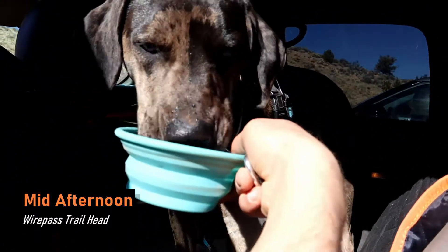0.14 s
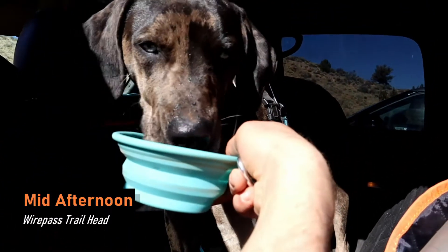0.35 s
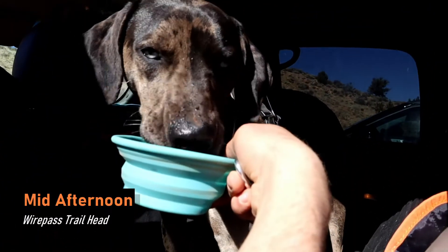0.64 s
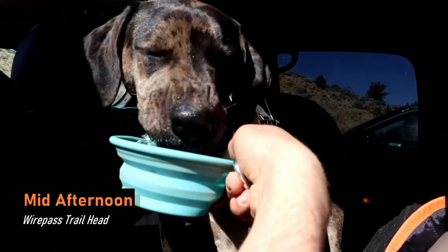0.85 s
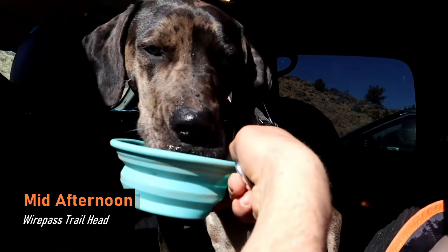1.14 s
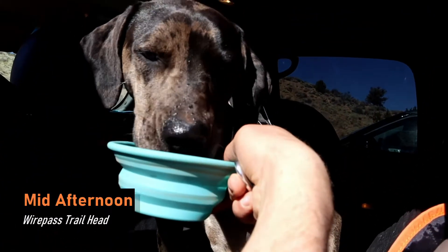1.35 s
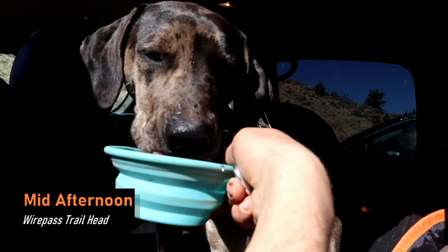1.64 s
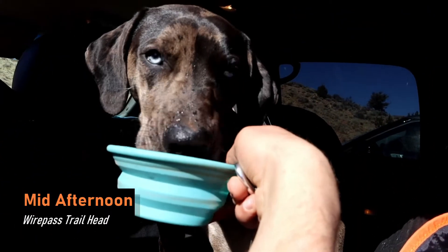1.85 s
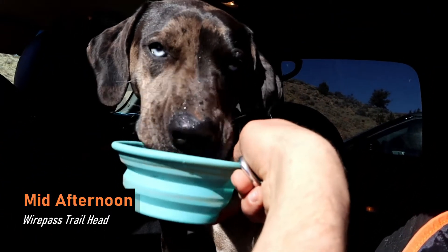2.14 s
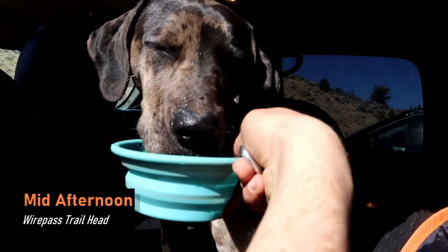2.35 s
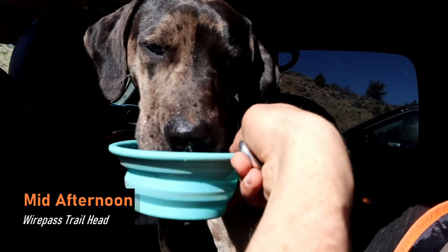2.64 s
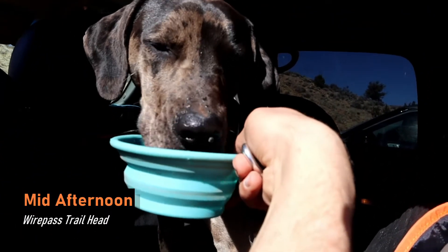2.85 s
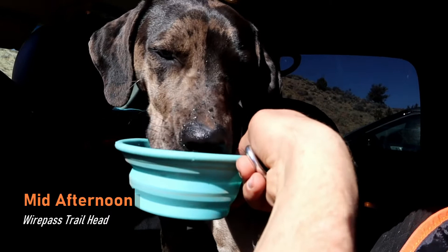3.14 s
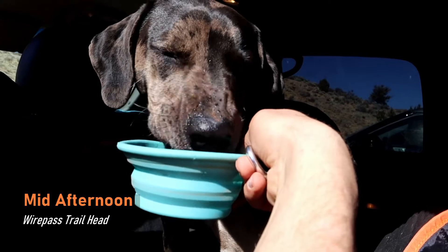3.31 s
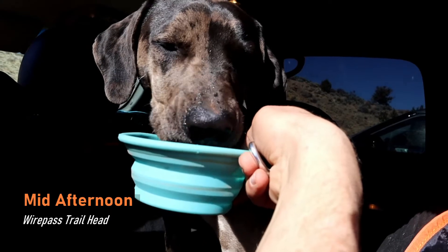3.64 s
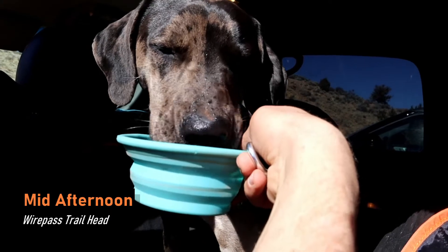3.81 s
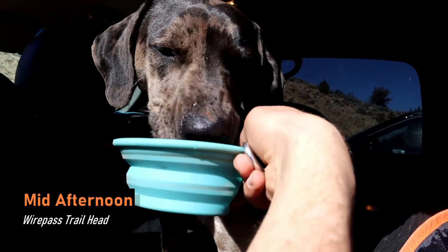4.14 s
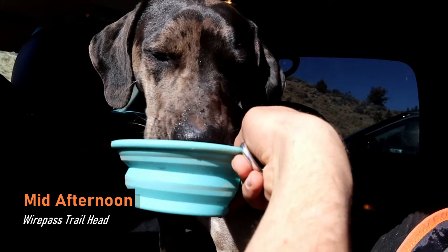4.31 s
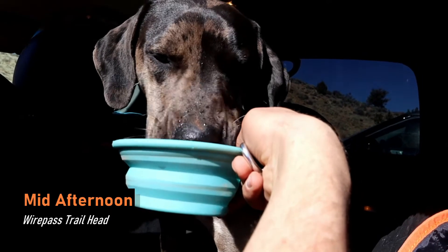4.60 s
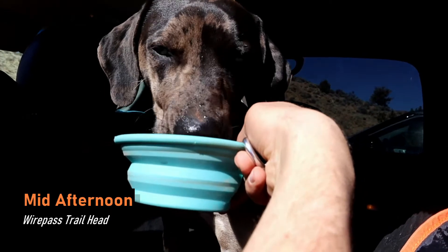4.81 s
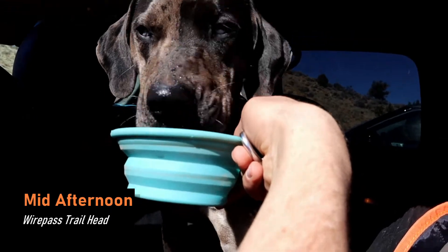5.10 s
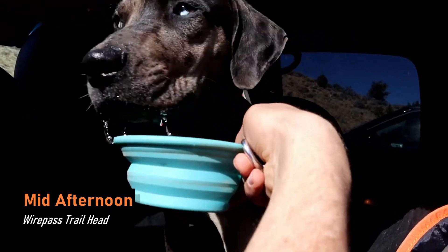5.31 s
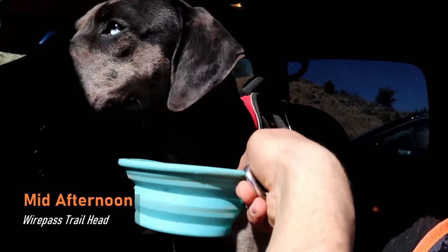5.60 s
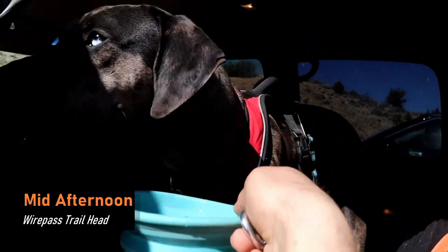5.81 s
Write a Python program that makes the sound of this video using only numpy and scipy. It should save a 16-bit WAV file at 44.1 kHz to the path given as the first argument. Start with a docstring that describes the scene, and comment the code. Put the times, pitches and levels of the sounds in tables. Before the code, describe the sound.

A dog drinks from a bowl right by the microphone inside a parked car. It laps steadily, two or three times a second, each lap a small slosh with bubbly pops and wet smacks. Drips, dull swallows and a few soft puffs through the nose come in between. A breeze rumbles on the microphone, strongest about halfway. Near the end the lapping stops, leaving a last smack and a soft breath out.

```python
"""Dog lapping water in a parked car

A dog drinks from a soft hand-held bowl, close to the microphone. Each lap is a slosh of small
bubbles, air pockets popping under the tongue and wet smacks of the mouth. Between laps the dog
swallows or blows through its nose; a breeze from outside buffets the microphone."""
import sys
import numpy as np
from scipy import signal
from scipy.fft import rfft, irfft, next_fast_len
from scipy.io import wavfile
from scipy.ndimage import uniform_filter1d

SR = 44100
rng = np.random.default_rng(int(sys.argv[2]) if len(sys.argv) > 2 else 0)


def master(y):
    """Save y as 16-bit WAV."""
    cut = np.clip(np.atleast_2d(y).T, -1, 1)
    pcm = np.round(cut * 32767)  # scale
    wavfile.write(sys.argv[1], SR, pcm.astype(np.int16))


N = 262783
TIME_S = np.arange(N) / SR
SLOW_S = np.arange(0, N + 16, 16) / SR   # envelope grid
CUTOFF_HZ = 16000

# tongue plunges: (start [s], length [s], mid-lap slosh [dB], mid-lap spray [dB])
LAPS = [(0.0, 0.17, -37.5, -43), (0.451, 0.15, -40, -43.5), (0.765, 0.19, -41, -45.5),
        (1.17, 0.086, -40, -39), (1.603, 0.19, -40.5, -46.5), (1.981, 0.17, -37, -45),
        (2.366, .17, -42.5, -44.5), (2.859, .16, -37.5, -43.5), (3.307, .085, -36, -39),
        (3.581, 0.2, -41, -41.5), (4.139, .11, -35.5, -42.5), (4.516, .125, -41, -42),
        (4.935, 0.061, -35, -44.5)]


def from_db(db):
    """Decibels to gain."""
    return 10 ** (np.asarray(db) / 20)


def unit_rms(x):
    """Scale to rms 1."""
    return x / np.sqrt(np.mean(x ** 2) + 1e-20)


def gain_at(spectrum, hz):
    """Gain of a (frequency [Hz], level [dB]) curve at hz."""
    points_hz, db = np.transpose(spectrum)
    return from_db(np.interp(np.log(hz + 1e-9), np.log(points_hz), db))


def band(x, low_hz, high_hz):
    """Causal band-pass."""
    return signal.sosfilt(signal.butter(2, [low_hz, high_hz], "band", fs=SR, output="sos"), x)


def lowpass(x, hz):
    """Causal low-pass."""
    return signal.sosfilt(signal.butter(2, hz, fs=SR, output="sos"), x)


def noise(spectrum):
    """Coloured noise, rolled off beyond the ends of its spectrum; rms 1."""
    size = next_fast_len(N)
    hz = np.fft.rfftfreq(size, 1 / SR) + 1
    rolloff = 1 / (1 + (spectrum[0][0] / hz) ** 6 + (hz / spectrum[-1][0]) ** 6)
    white = rfft(rng.standard_normal(size))
    return unit_rms(irfft(white * gain_at(spectrum, hz) * rolloff, size)[:N])


def steady(x, span_s):
    """Even out swells slower than span_s; rms about 1."""
    return x / np.sqrt(np.abs(uniform_filter1d(x ** 2, int(span_s * SR))) + 1e-9)


def add(track, s, sound):
    """Mix a sound into the track at time s."""
    i = int(np.clip(s * SR, 0, N - 1))
    track[i:i + len(sound)] += sound[:N - i]


def ring(hz, length_s, attack_s, glide):
    """A quickly choked resonance that glides in pitch (up if glide > 0)."""
    t = np.arange(int(3 * length_s * SR) + 2) / SR
    swell = (1 - np.exp(-t / attack_s)) * np.exp(-(t / length_s) ** 2)
    pitch_hz = hz * np.exp(glide * (np.tanh(t / length_s) - .5))
    return swell / swell.max() * np.sin(2 * np.pi * np.cumsum(pitch_hz) / SR)


def droplet(hz, cycles):
    """A small bubble rings for some cycles, with a slight random glide."""
    return ring(hz, cycles / hz, attack_s=1 / hz, glide=.08 * rng.standard_normal())


def tear(low_hz, high_hz, decay_s):
    """A water film tears in uneven jerks; peak 1."""
    t = np.arange(SR // 20) / SR
    jerks = np.exp(.7 * unit_rms(uniform_filter1d(rng.standard_normal(len(t)), SR // 700)))
    swell = np.sqrt(t) * np.exp(-t / decay_s)
    burst = band(rng.standard_normal(len(t)) * jerks * swell, low_hz, high_hz)
    return burst / np.abs(burst).max()


def strays(level_db, overrun_s, per_lap, hz=0, octaves=0, spread_db=3):
    """Small sounds scattered over each lap and just beyond: (time [s], level [dB], pitch [Hz])."""
    rows = []
    for start_s, length_s, *_ in LAPS:
        for k, (when, size, pitch) in enumerate(rng.random((per_lap, 3))):
            s = start_s + (k + when) / per_lap * (length_s + overrun_s)
            rows.append((s, level_db + spread_db * (2 * size - 1), hz * 2 ** (octaves * (pitch - .5))))
    return rows


def still_air(level_db=-56.5):
    """Faint, steady hiss."""
    # (frequency [Hz], level [dB])
    spectrum = [(60, -5), (800, -5), (2000, -11), (9000, -21), (18000, -22)]
    return from_db(level_db) * noise(spectrum)


def breeze(calm_db=-40, rise_s=.057, fall_s=.069):
    """Eddies at the microphone: deep rumble in light air, brighter in gusts."""
    # slow part of the wind: (time [s], level [dB])
    base_curve = [(0.0, -40.5), (0.63, -42.5), (1.16, -49.5), (2.44, -46.5), (2.56, -36), (3.42, -27),
                  (4.31, -45.5), (5.01, -47.5), (5.18, -31), (5.96, -44.5)]
    # gusts on top: (peak time [s], level [dB])
    gusts = [(0.25, -39), (0.6, -42), (2.03, -32), (2.498, -27.5), (2.66, -25.5), (3.091, -12),
             (3.422, -17.5), (3.55, -29), (3.84, -30), (4.62, -30.5), (5.168, -24.5), (5.76, -32.5)]
    # rumble: (frequency [Hz], level [dB])
    spectrum = [(16, -6), (45, 0), (62, 0), (80, -7), (120, -11), (220, -24), (500, -52)]
    gust_gain = 0
    for s, db in gusts:
        age_s = SLOW_S - s
        slope = 2 * age_s / np.where(age_s < 0, rise_s, fall_s)
        gust_gain = np.hypot(gust_gain, from_db(db) / np.cosh(np.clip(slope, -20, 20)))
    base_gain = from_db(np.interp(TIME_S, *np.transpose(base_curve)))
    gain = np.hypot(base_gain, np.interp(TIME_S, SLOW_S, gust_gain))
    deep = unit_rms(lowpass(noise(spectrum), hz=24))
    brightness = np.clip((20 * np.log10(gain) - calm_db) / 20, .1, 1)
    return gain * steady((1 - brightness) * deep + brightness * noise(spectrum), span_s=.041)


def cabin(x, wet_db=-15, t60_s=.07, delay_s=.004):
    """Seats and windows add a very short tail."""
    t = np.arange(SR // 4) / SR
    decay = from_db(-60 * t / t60_s) * (t > delay_s)
    tail = band(rng.standard_normal(len(t)) * decay, 180, 13500)
    return x + from_db(wet_db) * signal.fftconvolve(x, tail / np.linalg.norm(tail))[:N]


def snuffs(ramp_s=.14):
    """Air hisses through the nose, swelling and fading."""
    # (start [s], end [s], level at full flow [dB])
    breaths = [(1.417, 1.66, -43.5), (3.345, 3.645, -46), (5.695, 6.068, -46)]
    # nasal hiss: (frequency [Hz], level [dB])
    spectrum = [(200, -8), (450, -3), (820, 1), (1150, -7), (1500, 0), (2900, -12), (4000, -4), (4400, -11),
                (5000, -6), (5700, -16), (16000, -22)]
    gain = np.zeros(N)
    for start_s, end_s, db in breaths:
        flow = np.clip(np.minimum(TIME_S - start_s, end_s - TIME_S) / ramp_s, 0, 1)
        gain += from_db(db) * flow
    return gain * noise(spectrum)


def drips(min_db=-38, range_db=12, centre_hz=1300, octaves=1.34, cycles=2.1, end_s=5.3, count=130):
    """Water runs off the jowls into the bowl: faint plips, each with a wet tear."""
    out = np.zeros(N)
    tears = [tear(600, 3200, decay_s=.002) for _ in range(12)]
    for k, (when, size, pitch) in enumerate(rng.random((count, 3))):
        s = (k + when) / count * end_s
        peak = from_db(min_db + range_db * size)
        hz = centre_hz * 2 ** (octaves * (pitch - .5))
        add(out, s, peak * ring(hz, cycles / hz, attack_s=1 / hz, glide=.24))
        add(out, s, peak * from_db(-8) * tears[k % len(tears)])
    return out


def gurgles(glide=.225, churn_hz=70):
    """A bubbling note rises as the hollow of the tongue fills."""
    # (start [s], length [s], level [dB], pitch [Hz])
    fills = [(0.51, 0.072, -35.5, 582), (1.68, 0.11, -37, 558), (2.93, 0.096, -37, 590),
             (3.58, 0.045, -36, 570), (3.675, 0.039, -32, 853)]
    out = np.zeros(N)
    for s, length_s, db, hz in fills:
        progress = np.linspace(0, 1, int(length_s * SR))
        complex_noise = [1, 1j] @ rng.standard_normal((2, SR // 2))
        churn = lowpass(complex_noise, churn_hz)[-len(progress):]
        pitch_hz = hz * np.exp(glide * (progress - .5))
        note = churn * np.exp(2j * np.pi * np.cumsum(pitch_hz) / SR)
        add(out, s, from_db(db) * np.sin(np.pi * progress) * unit_rms(note.real))
    return out


def gulps(pitch_hz=222, knock_db=-9):
    """A dull knock of jaw and throat with a short, low ring."""
    # (time [s], level [dB], ring length [s])
    swallows = [(0.176, -27, 0.012), (0.217, -30.5, 0.018), (0.998, -31, 0.012), (1.252, -31, 0.014),
                (1.320, -25, 0.017), (1.368, -27, 0.0081), (1.848, -34.5, 0.029), (2.589, -20.5, 0.0041),
                (3.032, -20, 0.011), (3.784, -28.5, 0.0049), (3.830, -26.5, .008), (4.21, -35, 0.012),
                (4.26, -25, 0.012), (4.306, -29.5, 0.022), (4.636, -25.5, .012)]
    out = np.zeros(N)
    for (s, db, length_s), detune in zip(swallows, rng.normal(1, .05, len(swallows))):
        add(out, s, from_db(db) * ring(pitch_hz / detune, length_s, attack_s=.00037, glide=.052))
        add(out, s, from_db(db + knock_db) * tear(340, 560, decay_s=.0013))
    return out


def movement(start_s, hold_s, attack_s, release_s):
    """Envelope of one stir: the water starts to move just before it and fizzes on after it."""
    lead_db, lead_s = -14, .03
    settle_db, settle_s = -16.5, .1
    age_s = SLOW_S - start_s
    after_s = np.maximum(age_s - hold_s, 0)
    lead = from_db(lead_db) * np.exp(np.minimum(age_s, 0) / lead_s)
    settle = from_db(settle_db) * np.exp(-after_s / settle_s)
    rise = np.maximum(np.clip(age_s / attack_s, 0, 1), lead)
    return rise * np.maximum(np.exp(-after_s / release_s), settle)


def stirring(slosh_sag_db=5, spray_rise_db=15):
    """Slosh and spray gains: laps shift towards spray as the tongue lifts; squelches are brief."""
    # mouth shuts or opens on the water: (time [s], slosh [dB], spray [dB])
    squelches = [(0.217, -28, -36.5), (0.67, -40.5, -49), (0.999, -29, -32.5), (1.366, -29.5, -34),
                 (1.453, -43.5, -41), (1.844, -31, -37), (2.211, -31, -34.5), (2.586, -37.5, -36),
                 (2.753, -46.5, -51.5), (3.078, -30.5, -35), (3.241, -29, -43), (3.505, -35, -40.5),
                 (3.827, -33.5, -40.5), (4.069, -53, -41.5), (4.308, -29, -36), (4.698, -33.5, -38),
                 (5.09, -34, -40), (5.196, -46, -49), (5.525, -28, -30.5), (5.693, -42.5, -46.5)]
    power = np.zeros((2, len(SLOW_S)))
    for s, length_s, slosh_db, spray_db in LAPS:
        lift = np.clip((SLOW_S - s) / length_s, 0, 1) - .5
        gains = from_db([slosh_db - slosh_sag_db * lift, spray_db + spray_rise_db * lift])
        power += (gains * movement(s, length_s, attack_s=.004, release_s=.004)) ** 2
    for s, slosh_db, spray_db in squelches:
        gains = from_db([[slosh_db], [spray_db]])
        power += (gains * movement(s, hold_s=.025, attack_s=.0017, release_s=.016)) ** 2
    return [np.interp(TIME_S, SLOW_S, gain) for gain in np.sqrt(power)]


def bubbles(spectrum, per_s, spread_db, sizes=60):
    """Bubbles form at random, rarer above 5 kHz, over a noise wash of fainter ones; rms 1."""
    out = np.zeros(N)
    pitches_hz = np.geomspace(spectrum[0][0], min(spectrum[-1][0], CUTOFF_HZ), sizes)
    shares = np.minimum(1, 5000 / pitches_hz)
    for hz, share in zip(pitches_hz, shares / shares.sum()):
        grain = droplet(hz, cycles=6 * np.sqrt(hz / 1000))
        grain *= gain_at(spectrum, hz) * np.sqrt(hz / share / np.sum(grain ** 2))
        births_s = rng.uniform(0, N / SR, int(per_s * share * N / SR))
        gains = from_db(spread_db * np.minimum(rng.exponential(1, len(births_s)), 4))
        for s, gain in zip(births_s, gains):
            add(out, s, gain * grain)
    return unit_rms(steady(out, span_s=.04) + .3 * noise(spectrum))


def water():
    """The tongue stirs large bubbles into the bowl and throws a fine spray."""
    # both: (frequency [Hz], level [dB])
    slosh_spectrum = [(260, -4), (550, 9), (1100, 2.5), (1550, 12), (2100, 6.5), (2900, -29.5)]
    spray_spectrum = [(2300, 0), (3800, 0), (5200, -3), (6500, -9), (8200, -17), (16500, -18)]
    slosh_gain, spray_gain = stirring()
    slosh = bubbles(slosh_spectrum, per_s=1400, spread_db=5)
    spray = bubbles(spray_spectrum, per_s=3000, spread_db=5.5)
    return slosh_gain * slosh + spray_gain * spray


def ticks():
    """Droplets burst with a short, high click; fainter ones come with every lap."""
    # (time [s], level [dB])
    bursts = [(0.6738, -24.5), (1.177, -17.5), (1.242, -13), (1.31, -18.5), (1.698, -21), (1.7254, -24.5),
              (1.857, -23), (2.0414, -25), (2.471, -28), (2.504, -20.5), (2.863, -24.5), (3.379, -23),
              (3.6697, -18.5), (3.7397, -14), (4.1892, -13), (4.204, -28), (4.331, -28), (4.6005, -18.5),
              (5.425, -27.5), (5.812, -26)]
    out = np.zeros(N)
    for s, db, *_ in bursts + strays(level_db=-29, overrun_s=.02, per_lap=4):
        add(out, s, from_db(db) * tear(7500, 16500, decay_s=.0014))
    return out


def smacks(ring_db=-2, tear_db=-6, shower_db=-7, shower_s=.0054, drops=5):
    """Tongue and lips part: a film snaps, a tiny pocket rings, droplets of similar size follow."""
    # (time [s], level [dB], pitch [Hz])
    snaps = [(0.136, -22, 4120), (0.227, -13, 5440), (0.303, -18.5, 5340), (0.456, -21.5, 3770),
             (0.6748, -25.5, 3840), (0.839, -18.5, 3020), (1.0296, -21, 5700), (1.078, -22, 3300),
             (1.17, -22.5, 3500), (1.18, -16.5, 3130), (1.2415, -27, 3550), (1.264, -24.6, 3670),
             (1.3694, -15, 4650), (1.6129, -22.5, 3350), (1.629, -15.5, 3700), (1.7796, -19.5, 3680),
             (1.847, -16.5, 5880), (1.853, -7.5, 5600), (1.9861, -18, 5850), (2.043, -15.5, 4100),
             (2.112, -15.5, 3100), (2.21, -11, 5150), (2.2268, -18.5, 5600), (2.3634, -23.5, 5720),
             (2.591, -18.5, 5100), (2.6835, -21, 4970), (3.087, -11, 5020), (3.242, -21, 3160),
             (3.736, -12.5, 5580), (3.8605, -13, 4520), (3.929, -21.5, 5100), (4.2334, -23, 4940),
             (4.3206, -20, 4940), (4.3404, -19, 3240), (4.5965, -13, 3030), (4.6868, -21, 5650),
             (4.7616, -21.5, 5740), (4.9506, -14.5, 3930), (4.992, -9, 3880), (5.0901, -17, 5400),
             (5.195, -19.5, 5270), (5.3098, -29.5, 4020), (5.54, -11, 3270)]
    out = np.zeros(N)
    for s, db, hz in snaps + strays(level_db=-26, overrun_s=.0055, per_lap=2, hz=3720, octaves=.88):
        pocket = ring(hz, length_s=.0014, attack_s=.0005, glide=.1 * rng.standard_normal())
        add(out, s, from_db(db + ring_db) * pocket)
        add(out, s, from_db(db + tear_db) * tear(2000, 5800, decay_s=.002))
        for late, detune in zip(rng.random(drops), np.clip(rng.standard_normal(drops), -2, 2)):
            drop = droplet(hz * np.exp(.18 * detune), cycles=9)
            add(out, s + shower_s * late, from_db(db + shower_db) * (1 - late / 2) * drop)
    return out


def pops(attack_s=.00041, glide=.059, lower_db=-6, upper_db=-11, tear_db=-12, rebound_db=-6):
    """An air pocket opens with a main note, two side notes and a tear, then rings as flesh rebounds."""
    # louder pockets between tongue, lips and water; fainter ones are scattered over each lap: (time [s], main
    # note level [dB], pitch [Hz])
    loud_pockets = [(0.0405, -21, 1530), (0.1375, -18, 1064), (0.2266, -15, 1820), (0.248, -27, 1660),
                    (0.2998, -15.5, 1875), (0.333, -28, 556), (0.385, -33.5, 870), (0.4611, -16.5, 1820),
                    (0.4692, -12, 2010), (0.498, -18, 1540), (0.7841, -24, 1060), (0.8484, -3, 1560),
                    (0.8658, -18, 1510), (0.8871, -19.5, 1490), (0.9131, -11, 1540), (1.0025, -15, 1480),
                    (1.0109, -30, 1390), (1.0187, -19, 1700), (1.0321, -21, 1960), (1.0785, -28, 2640),
                    (1.1873, -17.5, 1620), (1.2205, -17, 2780), (1.2484, -23, 525), (1.3697, -20, 1600),
                    (1.4065, -20, 1520), (1.6206, -15.5, 1620), (1.6476, -16, 750), (1.6577, -10.5, 1420),
                    (1.7584, -20, 1420), (1.783, -20, 1590), (1.8457, -13, 1450), (1.8545, -8.5, 1650),
                    (1.861, -9.5, 1800), (1.908, -28, 540), (1.9885, -15, 1480), (1.9995, -11.5, 1780),
                    (2.0375, -24.5, 736), (2.1132, -21, 1590), (2.2115, -19, 1074), (2.3801, -25.5, 1480),
                    (2.4716, -17.5, 2930), (2.5907, -18.5, 1940), (2.631, -24, 1480), (2.8634, -22, 1520),
                    (2.8804, -22, 1500), (3.0856, -6.5, 1595), (3.0987, -14, 1930), (3.2527, -19, 1840),
                    (3.2644, -14, 1510), (3.2711, -18.5, 1100), (3.3217, -15, 1970), (3.334, -15.5, 2280),
                    (3.3661, -20, 1580), (3.518, -23, 860), (3.7345, -11.5, 1560), (3.9399, -28.5, 1075),
                    (4.0807, -13, 1920), (4.0929, -15, 1860), (4.1654, -24.5, 1065), (4.2096, -23.5, 550),
                    (4.2403, -17, 1430), (4.3206, -12, 1574), (4.3397, -14, 1910), (4.3753, -25, 1850),
                    (4.4896, -23.5, 1900), (4.5227, -15, 1640), (4.5977, -17, 1480), (4.6934, -23, 600),
                    (4.7113, -14, 1487), (4.8601, -25, 1500), (4.9513, -17.5, 975), (4.9614, -17, 1480),
                    (4.9918, -15.5, 1530), (5.0897, -21, 1650), (5.1145, -28, 1550), (5.268, -33.5, 550),
                    (5.5, -26, 2330), (5.5275, -21, 480), (5.5402, -20, 552), (5.5513, -22, 485)]
    pockets = loud_pockets + strays(level_db=-24.5, overrun_s=.012, per_lap=3, hz=1410, octaves=1.71)
    out = np.zeros(N)
    for (s, db, hz), (slide, low, high, late) in zip(pockets, rng.random((len(pockets), 4))):
        length_s = 6.14 / np.sqrt(hz * 1500)   # larger pockets ring longer
        main = ring(hz, length_s, attack_s, 2 * glide * slide)
        lower = ring(hz * (.58 + .2 * low), .8 * length_s, attack_s, glide)
        upper = ring(hz * (1.25 + .35 * high), length_s, attack_s, glide)
        rebound = ring(hz * (.792 + .69 * high), length_s, attack_s, glide)
        rebound_s = .002022 + .001308 * late
        add(out, s, from_db(db) * main)
        add(out, s, from_db(db + lower_db) * lower)
        add(out, s, from_db(db + upper_db) * upper)
        add(out, s, from_db(db + tear_db) * tear(650, 2600, decay_s=.0025))
        add(out, s + rebound_s, from_db(db + rebound_db) * rebound)
    return out


def scene():
    """Dog in the cabin, breeze and still air; mono."""
    dog = snuffs() + pops() + smacks() + ticks() + gulps() + gurgles() + water() + drips()
    return (cabin(dog) + breeze() + still_air())[None]


def record(dry):
    """Clip at full scale, then low-pass steeply."""
    top_cut = signal.ellip(10, .1, 80, CUTOFF_HZ, fs=SR, output="sos")
    return signal.sosfilt(top_cut, np.clip(dry, -1, 1))


dry = scene()
out = record(dry)
master(out)
```